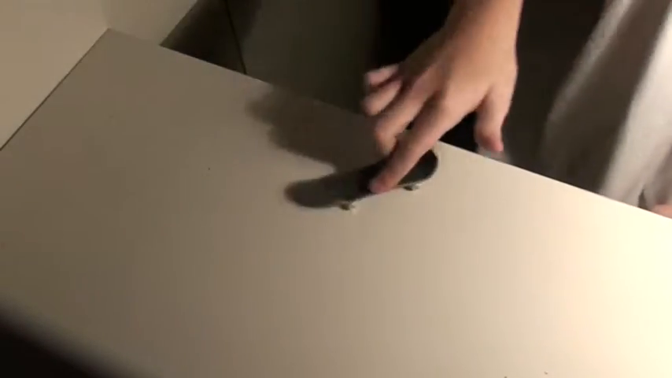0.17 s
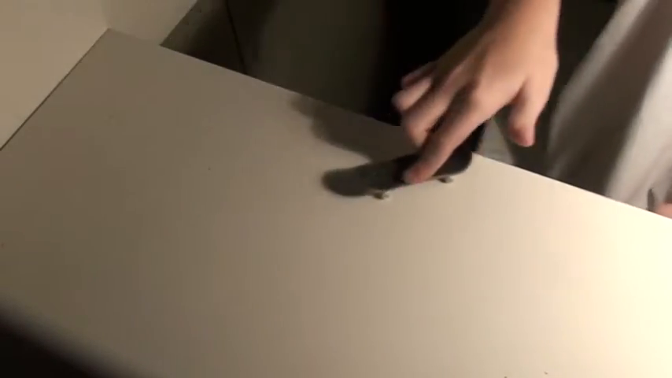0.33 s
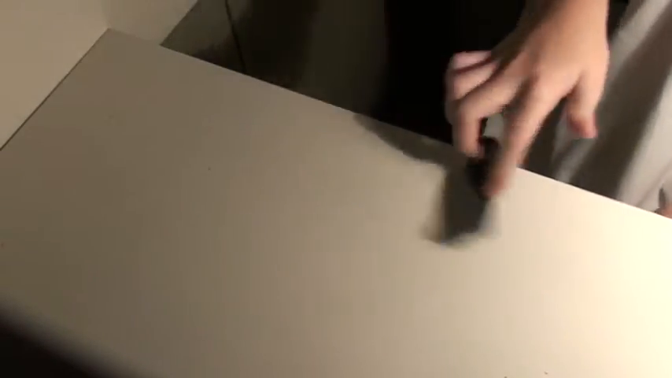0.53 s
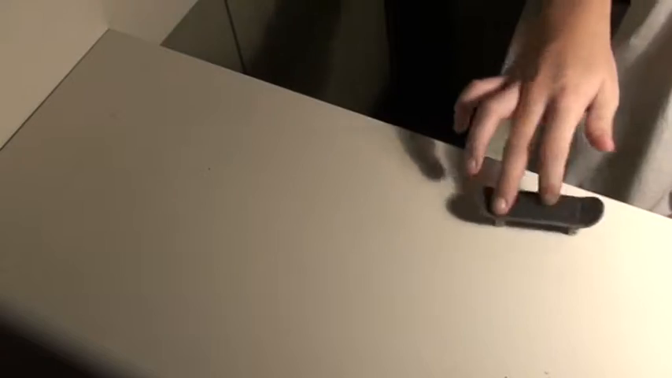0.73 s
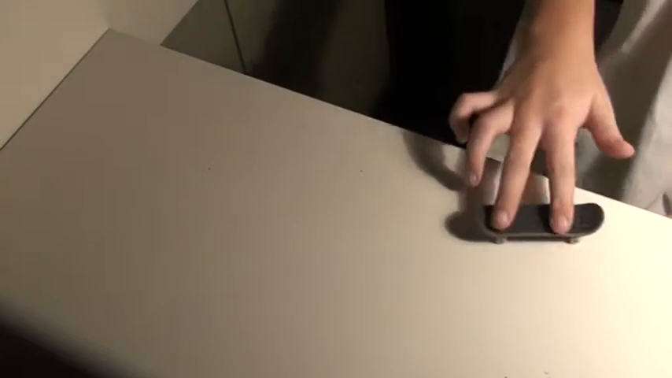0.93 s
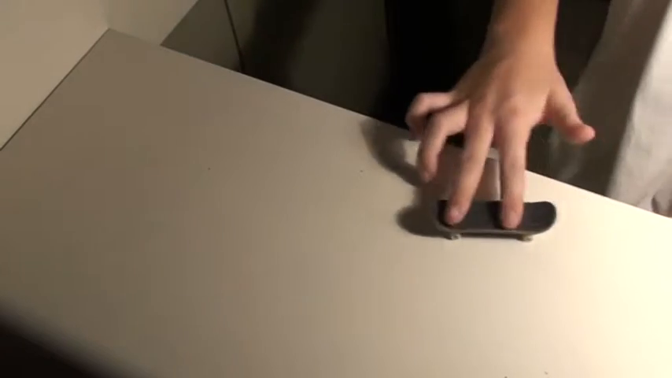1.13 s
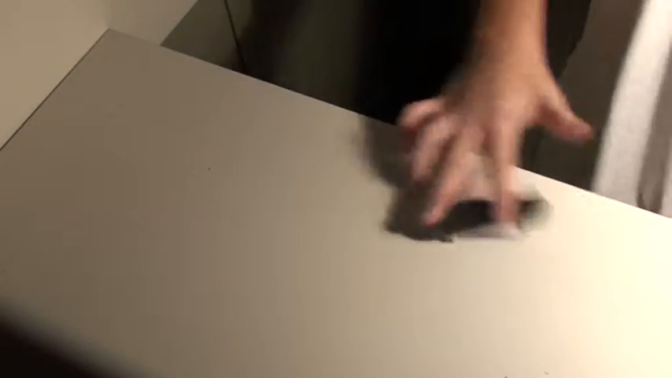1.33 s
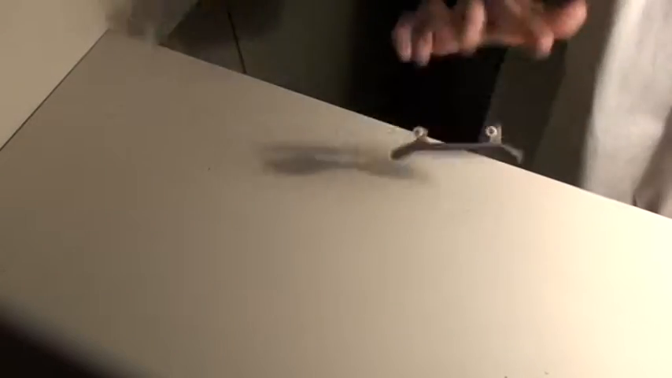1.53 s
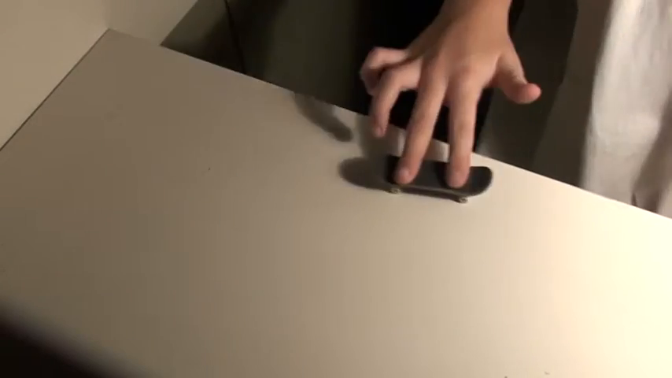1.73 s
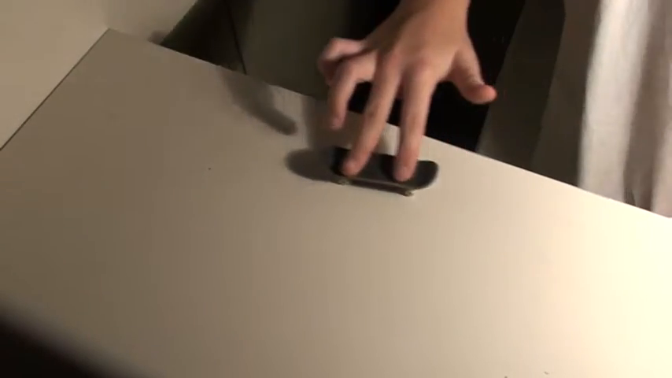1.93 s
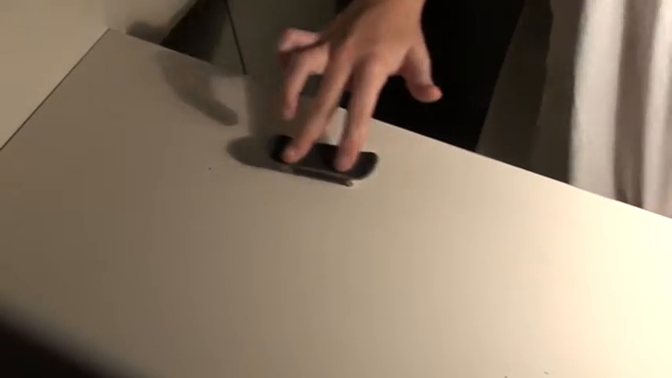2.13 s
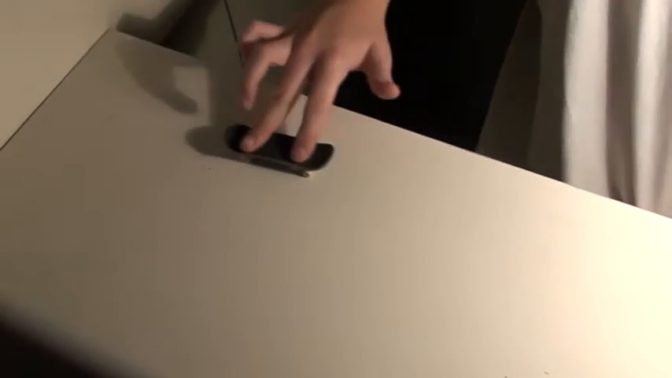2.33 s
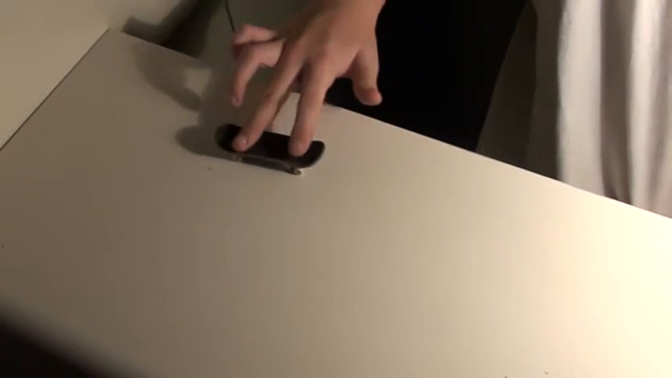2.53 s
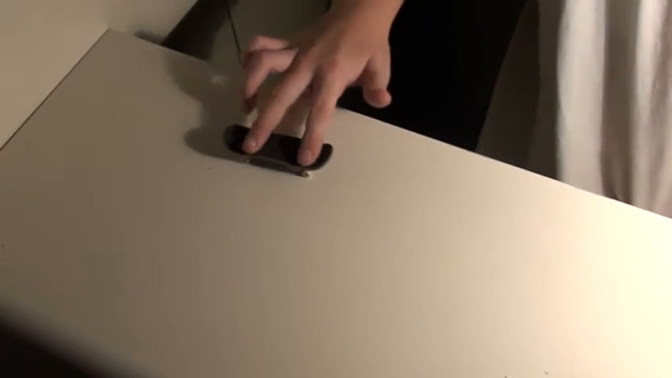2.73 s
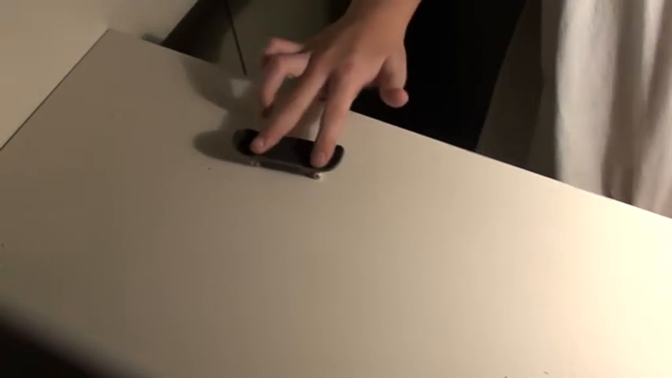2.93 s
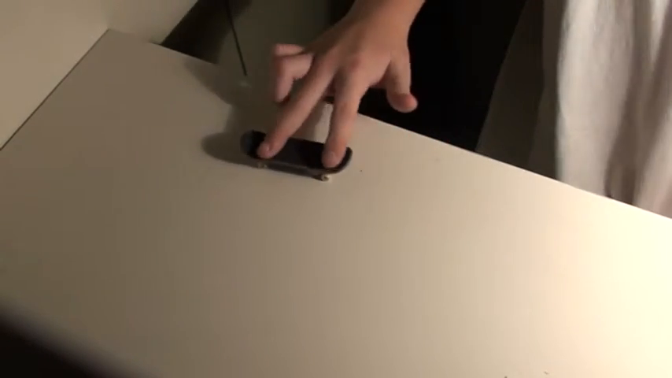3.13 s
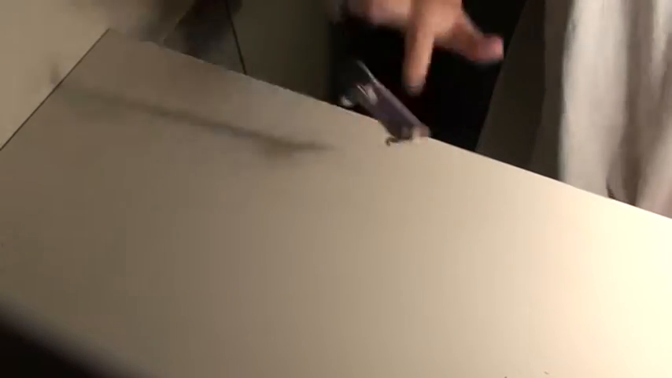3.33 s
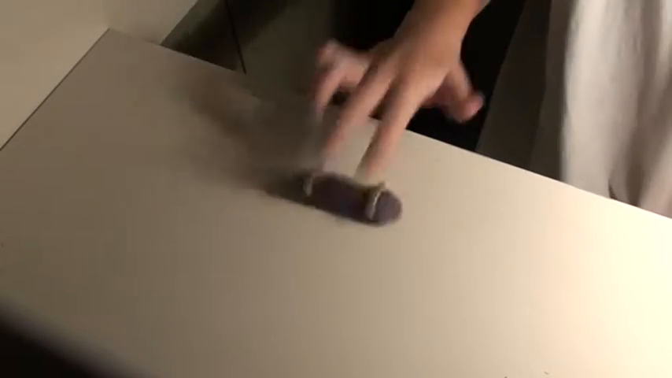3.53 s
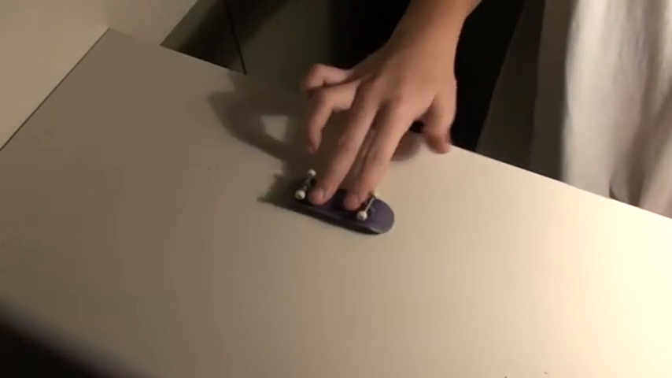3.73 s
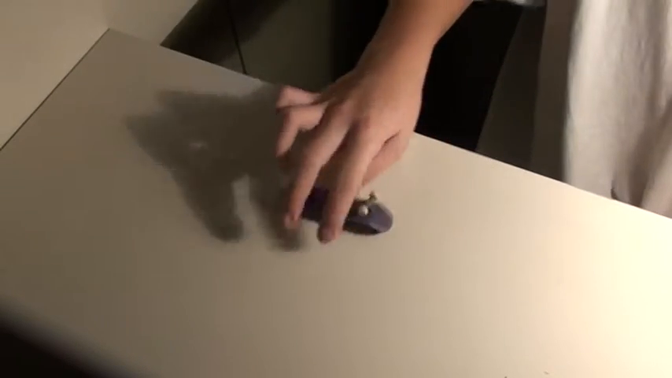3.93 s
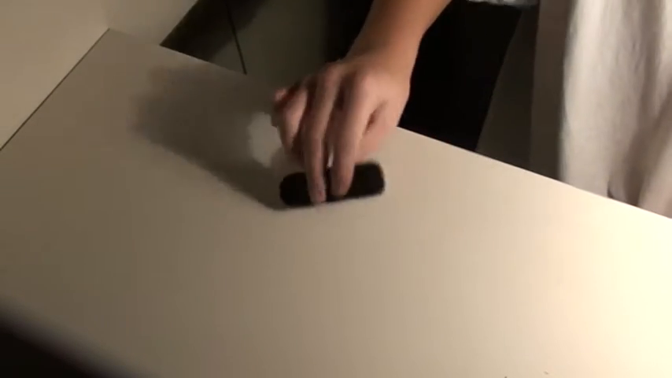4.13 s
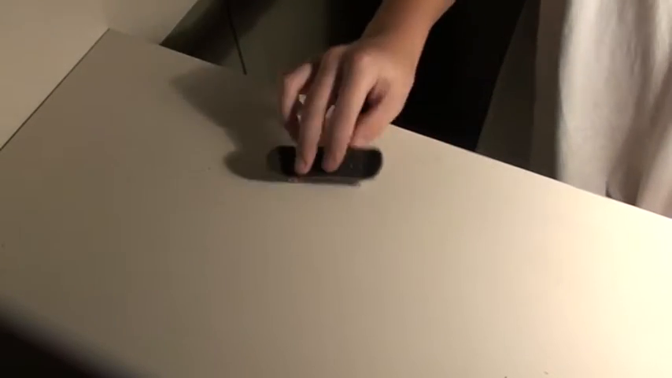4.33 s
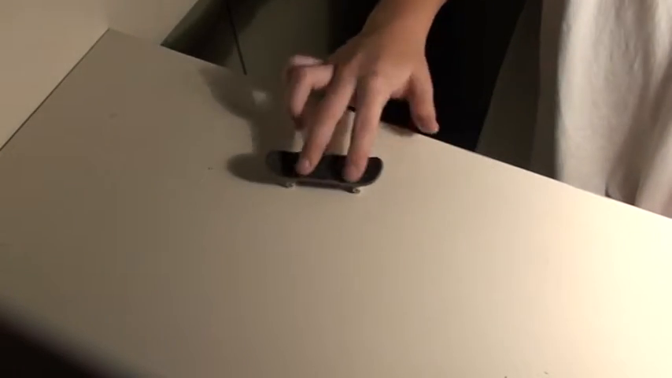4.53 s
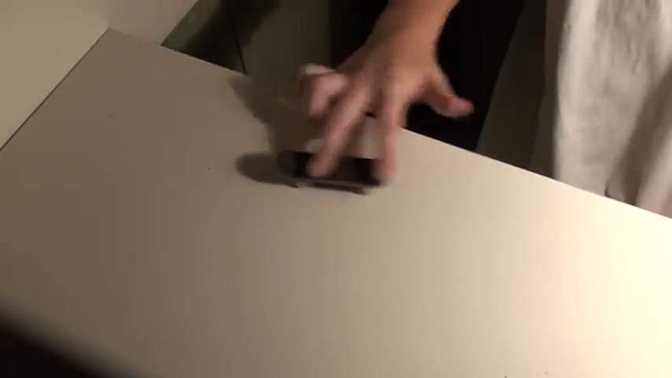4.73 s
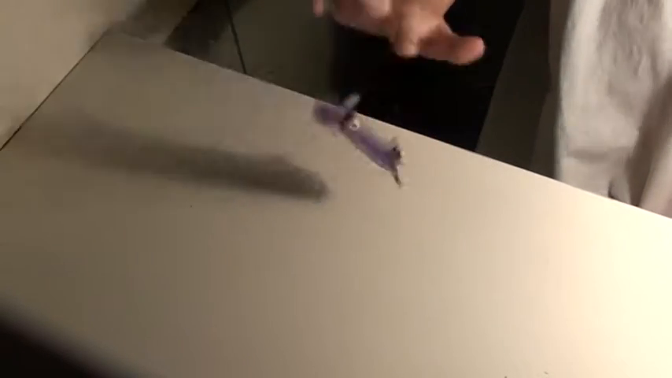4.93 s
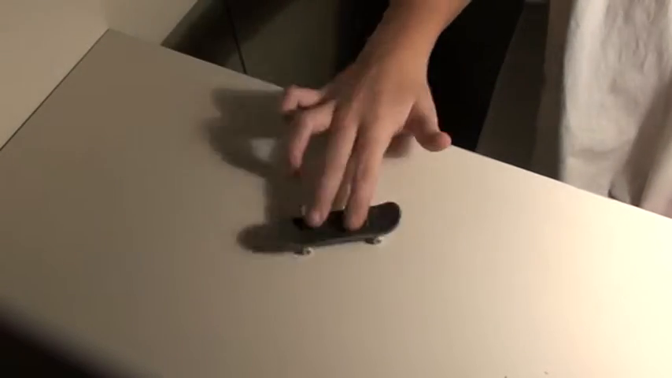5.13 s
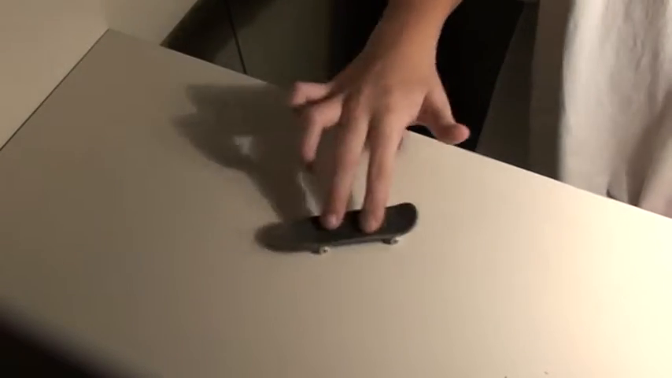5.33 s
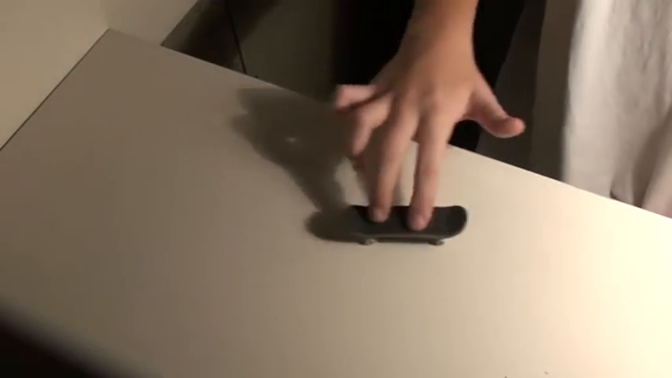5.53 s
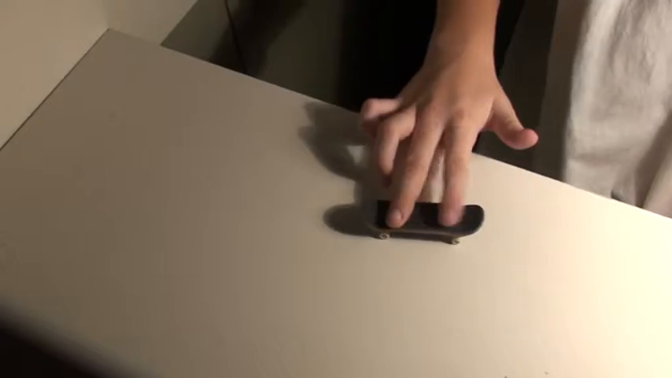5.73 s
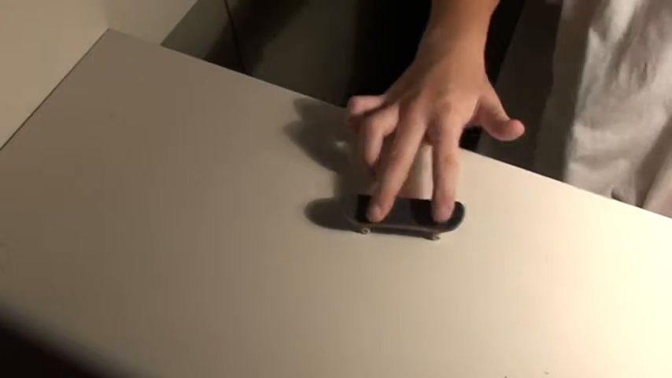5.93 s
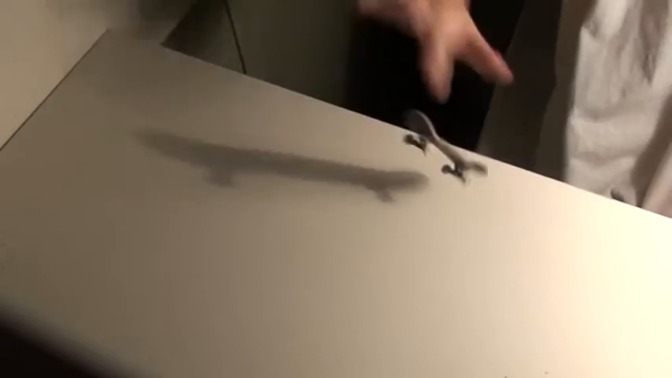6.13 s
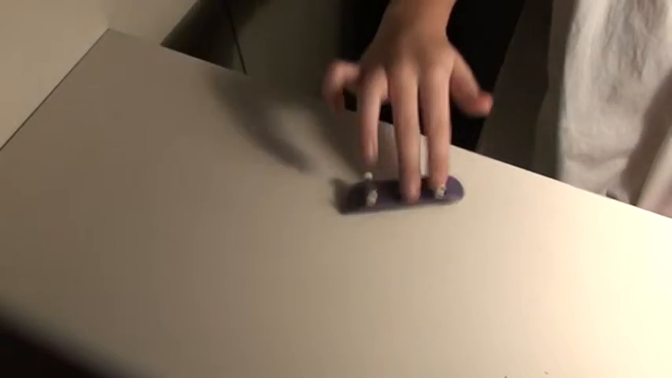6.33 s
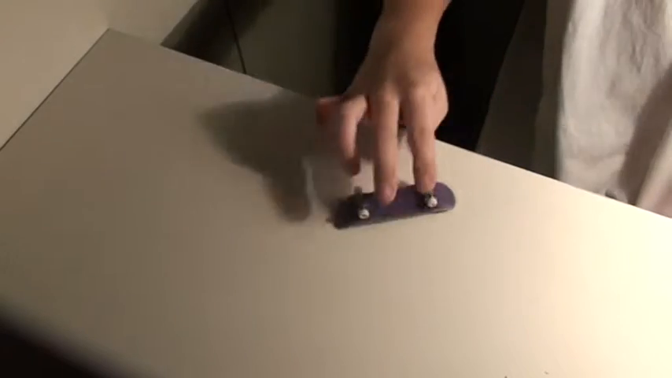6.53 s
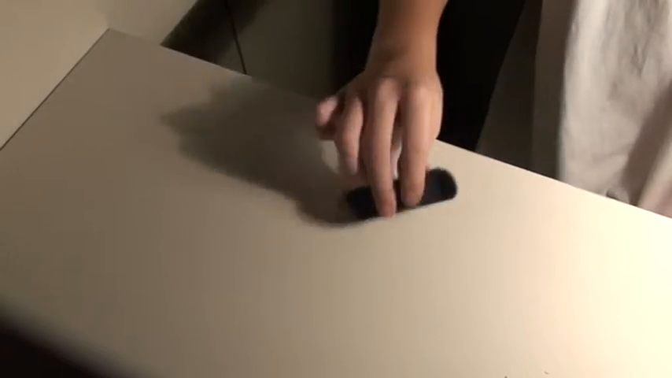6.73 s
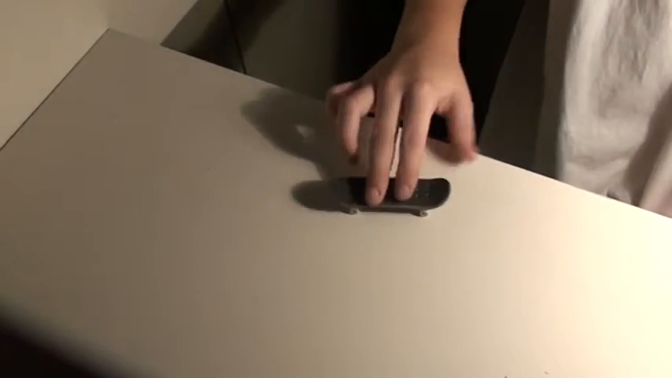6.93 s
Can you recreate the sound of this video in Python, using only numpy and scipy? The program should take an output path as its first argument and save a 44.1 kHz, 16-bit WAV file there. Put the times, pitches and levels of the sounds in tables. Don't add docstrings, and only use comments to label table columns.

```python
import sys
import numpy as np
from scipy import signal
from scipy.fft import rfft, irfft, next_fast_len
from scipy.io import wavfile

SR = 44100
rng = np.random.default_rng(int(sys.argv[2]) if len(sys.argv) > 2 else 0)


def gain_from_db(level_db):
    decades = np.asarray(level_db, float) / 20
    return 10 ** decades


def dump(signal):
    limited = np.clip(np.atleast_2d(signal).T, -1, 1)
    pcm = np.round(limited * 32767).astype(np.int16)
    wavfile.write(sys.argv[1], SR, pcm)


N = 311787

# (frequency [Hz], width [Hz], level [dB])
TABLE_MODES = [(110, 37, -16), (150.3, 31.6, -3.5), (175.7, 30.3, 1), (230, 150, -19), (387, 117, -1.5)]
# (frequency [Hz], width [Hz], level [dB])
DECK_MODES = [(399, 38, -8), (639.5, 73, 4), (880, 119, 2.5), (1091, 207, 3), (1320, 238, 8),
              (1500, 258, 8), (1710, 280, 7), (2065, 333, 9), (2205, 596, 8), (3020, 1400, -28)]
# (frequency [Hz], width [Hz], level [dB])
AXLE_MODES = [(3180, 1010, -2.5), (4130, 155, -3), (4590, 380, -3.5), (5770, 1100, 1.5), (6405, 670, 1.5),
              (7300, 950, 7), (7850, 1990, 8.5), (9930, 3100, 6.5), (11520, 2670, 3), (14100, 3000, -23.5)]
# (time [s], axle level [dB], deck level [dB re axle], deck pitch [Hz], axle pitch [Hz])
TAP_EVENTS = [(0.3026, -50, 1, 600, 3640), (0.3736, -49.5, -19, 1090, 3670),
              (0.489, -32.5, -13, 1310, 3500), (0.7714, -40, -3.5, 1560, 7220),
              (0.898, -39.5, -1.5, 1330, 4060), (1.051, -41, -1.5, 1710, 5230),
              (1.2431, -48, -1, 1330, 3780), (2.0693, -48.5, -1, 875, 4590), (2.1655, -55, 11, 902, 3840),
              (2.177, -41.5, -1.5, 641, 7200), (2.2836, -50.5, 6, 867, 3580), (2.3932, -48, 3, 640, 6170),
              (2.462, -52, -1, 660, 4490), (2.54, -39.5, -3.5, 649, 6450), (2.737, -53, -7, 860, 8400),
              (2.9213, -51.5, -13, 797, 4640), (3.984, -43, -4.5, 1810, 4570),
              (4.0088, -39.5, -14, 1430, 4080), (4.775, -42, -5, 1310, 4830),
              (5.5146, -43.5, -8, 880, 4080), (5.7018, -40, -21, 1335, 3750),
              (6.7222, -38.5, -6, 686, 4130)]


def rms_one(x):
    return x / np.sqrt(np.mean(x ** 2) + 1e-20)


def at_hz(points, hz):
    point_hz, value = np.transpose(points)
    return np.interp(np.log(hz), np.log(point_hz), value)


def drift(rate_hz):
    step, settle = 40, 2000
    r = np.exp(-2 * step * np.pi * rate_hz / SR)
    noise = rng.standard_normal(N // step + settle + 2)
    slow = signal.lfilter([1], [1, -2 * r, r * r], noise)[settle:]
    return np.interp(np.arange(N) / step, np.arange(len(slow)), rms_one(slow))


def resonance(x, hz, width_hz):
    r, w = np.exp(-np.pi * width_hz / SR), 2 * np.pi * hz / SR
    return signal.lfilter([0.5, 0, -0.5], [1, -2 * r * np.cos(w), r * r], x + 1e-18)


def grains(shape, per_s, spread_db):
    sizes = gain_from_db(spread_db * np.minimum(rng.exponential(1, shape), 4))
    return sizes * rng.choice([-1, 1], shape) * (rng.random(shape) < per_s / SR)


def stereo_noise(length, shape_of):
    # (frequency [Hz], likeness
    likeness = [(60, 0.96), (190, 1), (290, 0.54), (600, .6), (1500, 0.51), (5000, 0.53), (9000, 0.3),
                (11000, 0.2), (12500, 0.92)]
    hz = np.maximum(np.fft.rfftfreq(length, 1 / SR), 1)
    mid, side = rfft(rng.standard_normal((2, length)))
    alike = np.clip(at_hz(likeness, hz), 0, 1)
    pair = np.sqrt(1 + alike) * mid + np.sqrt(1 - alike) * side * [[1], [-1]]
    return shape_of(pair, hz)


def knocks(places):
    # (time [s], axle level [dB], deck level [dB re axle], deck pitch [Hz], axle pitch [Hz])
    landings = [(0.0273, -14.5, -12, 2220, 6470), (0.033, -13, -8, 2140, 4090),
                (0.0409, -15, -26, 1400, 7680), (0.0558, -15.5, -6, 1400, 8420),
                (0.0665, -17, -3, 1420, 5830), (0.0858, -16.5, -5, 1470, 8270),
                (0.1103, -24, 0, 1720, 9090), (1.6387, -13, -11, 1800, 9900),
                (1.6514, -16.5, -22, 2390, 6740), (1.6583, -16.5, -11, 1210, 9120),
                (1.6641, -17.5, 0, 1320, 7850), (1.7011, -24.5, -3, 686, 8000),
                (3.5636, -16, 0.5, 1710, 4730), (3.6003, -13.5, -4, 1280, 6500),
                (3.6116, -15, -3.5, 781, 3640), (5.0647, -13, -2, 1320, 4130),
                (5.0943, -13.5, -27, 1390, 6800), (5.1396, -12, -20, 1300, 7550),
                (5.1511, -14, -10.5, 1380, 7130), (5.1682, -20.5, -4.5, 860, 8390),
                (6.2971, -24, 9.5, 1800, 6500), (6.33, -16.5, 1, 1380, 8020),
                (6.3839, -12.5, -9.5, 1310, 4030), (6.3937, -18.5, -0.5, 675, 4390)]
    # (time [s], axle level [dB], deck level [dB re axle], deck pitch [Hz], axle pitch [Hz])
    pops = [(1.3372, -41, 13, 1280, 4070), (1.4074, -14, -11, 650, 5800), (2.6777, -35, 2, 1200, 7300),
            (2.6845, -39, 8, 875, 6000), (3.2284, -37, -5, 1120, 4230), (3.2983, -16, -14, 700, 7360),
            (4.0826, -22, -1.5, 1400, 4560), (4.3926, -19, -15, 1850, 7500),
            (4.4116, -19.5, -0.5, 1200, 6170), (4.4204, -34, -2, 1780, 3840),
            (4.8284, -17, -9.5, 600, 7100), (4.877, -31, -7, 680, 7740), (6.0906, -18, -9, 1000, 7950),
            (6.0935, -18, -8.5, 900, 7580), (6.6548, -39.5, -3, 1960, 4600), (6.6614, -35, -20, 651, 4150),
            (6.7474, -20.5, -3, 1360, 4850), (6.8096, -34, -16, 1920, 4910), (6.9132, -16, -9, 606, 8260),
            (6.9452, -22, -5, 1270, 7500)]
    # (events, chatter decay [s], size of first click)
    kinds = (landings, 0.016, 1.37), (pops, 0.008, 0.6), (TAP_EVENTS, 0.0101, 1.2)
    contacts = sorted((*row, *manner) for rows, *manner in kinds for row in rows)

    age = np.arange(SR // 8) / SR
    chatter_rise_s = 0.0006
    chatter = 0.36 * grains((len(contacts), len(age)), per_s=5000, spread_db=2.5)
    chatter = chatter * (1 - np.exp(-age / chatter_rise_s))
    detune = 1 + 0.015 * rng.standard_normal((len(contacts), len(DECK_MODES) + len(AXLE_MODES)))
    out = np.zeros((places, N + len(age)))
    for n, (s, axle_db, deck_db, deck_hz, axle_hz, decay_s, first) in enumerate(contacts):
        blows = first * (age == 0) + chatter[n] * np.exp(-age / decay_s)
        modes = [(hz, w, db + deck_db - 4.7 * abs(np.log2(hz / deck_hz))) for hz, w, db in DECK_MODES]
        modes += [(hz, w, db - 3.64 * abs(np.log2(hz / axle_hz))) for hz, w, db in AXLE_MODES]
        start = round(s * SR)
        for k, (hz, w, db) in enumerate(modes):
            ring = rms_one(resonance(blows, hz * detune[n, k], w))
            out[n % places, start:start + len(age)] += (-1) ** k * gain_from_db(axle_db + db - 28.5) * ring
    return out[:, :N]


def touches():
    # (time [s], peak level [dB], frequency [Hz])
    hard_touches = [(0.0289, -18, 6200), (0.0349, -21, 4200), (0.0560, -14, 8300), (0.0562, -18, 1500),
                    (0.0711, -19, 1600), (0.0857, -22, 8400), (0.0975, -25, 1300), (0.1240, -28, 1000),
                    (0.4990, -36, 3500), (1.3714, -24, 1200), (1.4094, -19, 4000), (1.6410, -19, 12000),
                    (1.6520, -19, 6700), (1.6607, -18, 3500), (1.6662, -17, 1100), (1.7049, -30, 12500),
                    (2.4015, -50, 700), (2.4000, -52, 5500), (2.4684, -55, 5500), (2.5397, -41, 7000),
                    (2.6787, -27, 900), (2.6848, -26, 900), (2.7385, -52, 8500), (3.2990, -15, 7500),
                    (3.3034, -23, 7200), (3.3030, -14, 2300), (3.5638, -17, 1050), (3.5667, -15, 1250),
                    (3.5720, -14, 1900), (3.6004, -16, 1300), (3.6006, -18, 7000), (3.6120, -15, 1900),
                    (3.6233, -21, 900), (4.0842, -21, 1400), (4.4139, -17, 1300), (4.4215, -26, 1800),
                    (4.8286, -17, 6800), (4.8298, -15.5, 7800), (4.8349, -17, 1800), (4.8405, -22, 7100),
                    (4.8450, -23, 600), (5.0645, -21, 12500), (5.0974, -19, 7200), (5.0960, -24, 12500),
                    (5.1396, -15, 7000), (5.1471, -18, 7500), (5.1504, -16, 6500), (5.1420, -25, 13000),
                    (6.0921, -19, 1500), (6.0925, -16.5, 7400), (6.2986, -15, 1250), (6.3023, -20, 2450),
                    (6.3326, -15, 1250), (6.3355, -20, 8000), (6.3899, -18, 4250), (6.3959, -18, 6000),
                    (6.6700, -34, 7100), (6.6640, -33, 11500), (6.9146, -21, 7700), (6.9476, -23, 1300)]
    sharpness = 5.0
    tilt_db_per_octave = 3.0
    click = np.arange(SR // 20) == 0
    out = np.zeros(N + len(click))
    for s, db, hz in hard_touches:
        ring = resonance(resonance(click, hz, hz / sharpness), hz, hz / 1.5)
        gain = gain_from_db(db + tilt_db_per_octave * np.log2(hz / 9000))
        start = round(s * SR)
        out[start:start + len(click)] += gain * ring / np.abs(ring).max()
    return out[:N]


def rings():
    # (time [s], peak level [dB], frequency [Hz])
    deck_rings = [(0.0677, -14, 1400), (1.3428, -19.5, 1320), (1.3665, -24.5, 1300), (4.0811, -24, 1410),
                  (4.4154, -19, 1510), (6.0907, -17, 1320), (6.2965, -19, 1300), (6.33, -14, 1370),
                  (6.7464, -20, 1400), (6.9476, -27, 1280)]
    # (time [s], peak level [dB], frequency [Hz])
    nose_rings = [(1.3554, -26.5, 1700), (4.4129, -29, 1430), (6.0933, -16.5, 1590), (6.2969, -16, 2378)]
    # (time [s], peak level [dB], frequency [Hz])
    axle_rings = [(1.4105, -33, 4180), (6.3844, -11.5, 4130), (6.563, -42, 4200), (6.657, -31, 4520),
                  (6.663, -41, 4160), (6.7241, -39, 4020)]
    kinds = (deck_rings, 114), (nose_rings, 49), (axle_rings, 149)   # (events, width [Hz])
    age = np.arange(SR // 8) / SR
    out = np.zeros(N + len(age))
    for rows, width_hz in kinds:
        for s, db, hz in rows:
            chatter = 0.3 * grains(len(age), per_s=800, spread_db=2.2) * np.exp(-age / 0.006)
            start = round(s * SR)
            out[start:start + len(age)] += gain_from_db(db - 5.5) * resonance((age == 0) + chatter, hz, width_hz)
    return out[:N]


def thuds():
    # (time [s], peak level [dB])
    heavy = [(0.03, -33.5), (0.055, -32), (0.067, -31), (0.087, -28), (0.35, -47.5), (1.339, -29),
             (1.411, -30.5), (1.64, -32.5), (1.666, -28.5), (2.678, -38.5), (3.299, -30.5), (3.566, -31.5),
             (3.602, -31), (3.615, -23.5), (4.082, -39.5), (4.394, -41), (4.415, -31.5), (4.83, -28),
             (5.065, -32), (5.095, -27.5), (5.141, -29), (5.171, -33), (6.0915, -27.5), (6.297, -30.5),
             (6.331, -27.5), (6.386, -31), (6.394, -29), (6.656, -42.5), (6.748, -38.5), (6.917, -37),
             (6.945, -37)]
    tap_push_db, softness_hz = -4.5, 900
    taps = [(s, axle_db + min(deck_db, 0) + tap_push_db) for s, axle_db, deck_db, *_ in TAP_EVENTS]
    s, db = np.transpose([*heavy, *taps])
    pushes = np.zeros(N)
    pushes[np.round(s * SR).astype(int)] = gain_from_db(db - 3.5)
    soften = signal.butter(2, softness_hz, fs=SR, output="sos")
    pushes = signal.sosfilt(soften, pushes + 1e-18)
    return sum(gain_from_db(db) * resonance(pushes, hz, w) for hz, w, db in TABLE_MODES)


def strokes():
    # (peak time [s], time to fall 20 dB [s], rumble level [dB], hiss level [dB], deck pitch [Hz])
    pushes = [(0.34, 0.5, -52.5, -60.5, 800), (0.72, 0.08, -44.5, -60, 700), (0.81, 0.11, -41, -46.5, 1180),
              (0.904, .06, -48, -54, 900), (1.05, 0.15, -50, -56, 1370), (1.13, 0.07, -40.5, -49.5, 833),
              (1.25, 0.09, -41, -46, 1240), (1.87, 0.2, -54, -60.5, 900), (2.01, 0.36, -50, -62, 990),
              (2.24, .27, -52.5, -65, 830), (2.42, .12, -63, -61, 702), (2.544, 0.02, -47.5, -57, 790),
              (3.76, 0.04, -60, -62, 600), (4.0, 0.05, -58.5, -56, 1010), (4.18, 0.14, -69, -56.5, 780),
              (4.28, 0.15, -65, -55.5, 763), (4.62, .15, -58, -67, 694), (5.39, 0.3, -57.5, -67, 820),
              (5.49, 0.12, -40.5, -58, 793), (5.65, 0.09, -48, -52.5, 700), (5.945, 0.14, -51.5, -63, 790),
              (6.74, 0.06, -47, -57, 1000), (6.815, 0.06, -53, -48, 1620), (7.05, .05, -66, -54, 957)]
    # (peak time [s], rumble level [dB], hiss level [dB])
    skids = [(0.185, -44.5, -46), (1.71, -35.5, -34.5), (2.905, -55.5, -61), (3.315, -46, -39),
             (3.65, -40.5, -39), (5.19, -48, -40), (6.45, -46.5, -47)]
    # (start [s], end [s], rumble level [dB], hiss level [dB], deck pitch [Hz])
    drags = [(0.486, 0.766, -40, -36, 1150), (1.337, 1.394, -31, -43, 1290), (3.235, 3.31, -31, -40, 1700),
             (4.037, 4.1, -45.5, -52, 1150), (4.751, 4.79, -46, -70, 900), (4.767, 4.827, -44, -45, 1200),
             (6.034, 6.113, -50, -51, 1350), (6.647, 6.7, -51, -41, 830)]
    rise_share, swell_power = 0.61, 1.29
    skid_rise_s, skid_fall_s, skid_hz = 0.017, 0.1, 900
    drag_peak_share, drag_rise, drag_fall = 0.51, 1.83, 0.99

    rows = [(0, s, N / SR, rise_share * fall_s, fall_s, *rest) for s, fall_s, *rest in pushes]
    rows += [(0, s, N / SR, skid_rise_s, skid_fall_s, *rest, skid_hz) for s, *rest in skids]
    for start_s, end_s, *rest in drags:
        s = start_s + drag_peak_share * (end_s - start_s)
        rows += [(start_s, s, end_s, drag_rise * (s - start_s), drag_fall * (end_s - s), *rest)]
    now = np.arange(0, N, 64) / SR
    start_s, s, end_s, rise_s, fall_s, rumble_db, hiss_db, hz = np.transpose(rows)[:, :, None]
    away = np.where(now < s, (s - now) / rise_s, (now - s) / fall_s)
    off_table = (now < start_s) | (now > end_s)
    swell_db = np.maximum(-20 * away ** swell_power - 100 * off_table, -200)
    rumble_power, hiss_power = gain_from_db(2 * (rumble_db + swell_db)), gain_from_db(2 * (hiss_db + swell_db))
    deck_hz = (rumble_power * hz).sum(axis=0) / rumble_power.sum(axis=0)
    return now, np.sqrt(rumble_power.sum(axis=0)), np.sqrt(hiss_power.sum(axis=0)), deck_hz


def rolling():
    now, rumble, hiss, deck_hz = strokes()
    dulling_db_per_octave, knee_hz = 5, 4810
    loose_hz, loose_width_hz, loose_db = 4100, 220, -9.0

    def smooth(control):
        return np.interp(np.arange(N) / SR, now, control)

    def grit(per_s):
        return grains(N, per_s, spread_db=2.77) * gain_from_db(2.0 * drift(25.0))

    dull, sharp = grit(3600), grit(5000)
    table = sum(gain_from_db(db) * resonance(dull, hz, w) for hz, w, db in TABLE_MODES)
    deck, axles = np.zeros(N), np.zeros(N)
    for k, (hz, w, db) in enumerate(DECK_MODES):
        octaves = np.log2(hz / deck_hz)
        gain = smooth(gain_from_db(db - 5.1 * abs(octaves) - 1.7 * octaves ** 2))
        deck += (-1) ** k * gain * rms_one(resonance(dull, hz, 1.19 * w))
    for k, (hz, w, db) in enumerate(AXLE_MODES):
        gain = gain_from_db(db - dulling_db_per_octave * max(np.log2(hz / knee_hz), 0))
        axles += (-1) ** k * gain * rms_one(resonance(sharp, hz, 1.26 * w))
    axles = rms_one(axles) + gain_from_db(loose_db) * rms_one(resonance(sharp, loose_hz, loose_width_hz))
    body = gain_from_db(-3.5) * rms_one(deck) + gain_from_db(-14.0) * rms_one(table)
    return smooth(rumble) * body + smooth(hiss) * gain_from_db(-8.0) * rms_one(axles)


def room(x):
    # (frequency [Hz], T60 [s])
    t60 = [(100, 0.26), (130, 0.3), (185, 0.19), (300, 0.27), (800, 0.21), (2000, 0.23), (6500, 0.25),
           (12000, 0.15)]
    length = SR // 2
    age = np.arange(length) / SR

    def decay(pair, hz):
        edges = 50 * 2 ** np.arange(0, 9.1, 0.25)
        return sum(irfft(pair * (hz >= low) * (hz < high), length) * gain_from_db(-60 * age / at_hz(t60, low * 0.88))
                   for low, high in zip(edges, edges[1:]))

    tail = stereo_noise(length, decay) * np.clip(age / 0.0013, 0, 1)
    tail = tail / np.sqrt(np.sum(tail ** 2) / 2)
    return signal.fftconvolve(x[None], tail, axes=1)[:, :N]


def background():
    # (frequency [Hz], density [dB per Hz])
    air_curve = [(15, -58), (25, -11), (83, -6.5), (125, -13.5), (202, -12), (266, -18.5), (422, -14.5),
                 (470, -12.5), (524, -15.5), (651, -16), (1060, -20), (1930, -22.5), (8140, -36),
                 (15200, -44), (16500, -50)]
    # (frequency [Hz], rms level [dB])
    hum_lines = [(91.5, -56), (199.2, -70.5), (473.7, -66.5), (651.4, -75.5), (888.2, -82.5), (1771, -98),
                 (1884, -76.5), (1992, -95)]
    length = next_fast_len(N)

    def colour(pair, hz):
        return irfft(pair * gain_from_db(at_hz(air_curve, hz)) * (hz > 20), length)

    air = stereo_noise(length, colour)[:, :N]
    wander_s = np.cumsum(0.00406 * drift(1.415)) / SR
    motor_s = np.arange(N) / SR + wander_s
    hum = np.zeros(N)
    for hz, db in hum_lines:
        level = gain_from_db(db + 1.5 + 1.4 * drift(5.2))
        hum += level * np.sin(2 * np.pi * (hz * motor_s + rng.random()))
    return gain_from_db(-62.5) * rms_one(air) + hum


def scene():
    board = knocks(places=3)
    board[0] += rolling()
    board[1] += rings()
    board[2] += touches()
    walls = sum(room(place) for place in board)
    table = thuds()
    pan = gain_from_db([[0.6], [-0.6]])
    board_heard = (board.sum(axis=0) + gain_from_db(-5.5) * walls) * pan
    return board_heard + table + gain_from_db(-2.0) * room(table) + background()


def band_limit(x):
    return signal.sosfilt(signal.butter(12, 16620, fs=SR, output="sos"), x)


def record(dry):
    bass_cut = signal.butter(2, 70.0, "high", fs=SR, output="sos")
    top_cut = signal.cheby2(16, 60, 16650, fs=SR, output="sos")
    heard = signal.sosfilt(bass_cut, dry)
    limited = 0.54 * np.tanh(heard / 0.38)
    return band_limit(signal.sosfilt(top_cut, limited))


dry = scene()
out = record(dry)
dump(out)
```